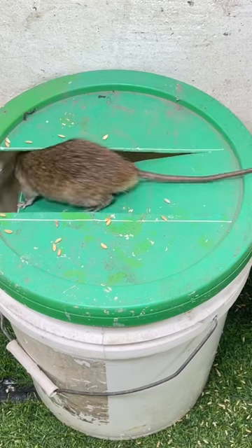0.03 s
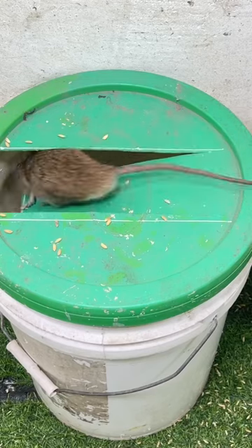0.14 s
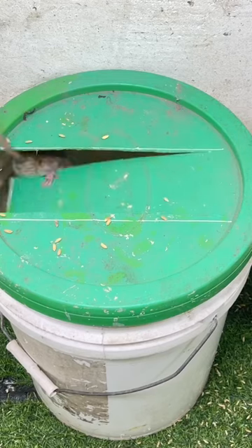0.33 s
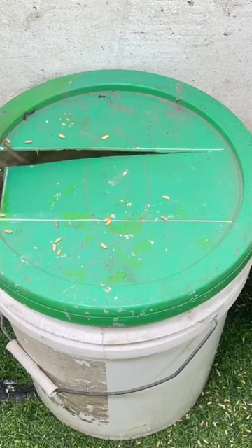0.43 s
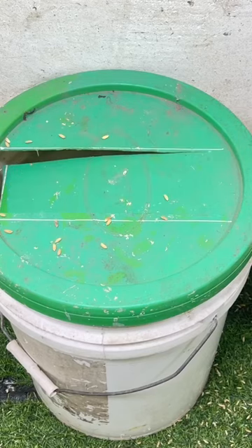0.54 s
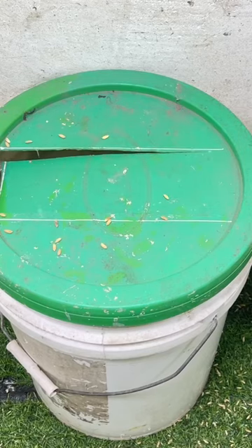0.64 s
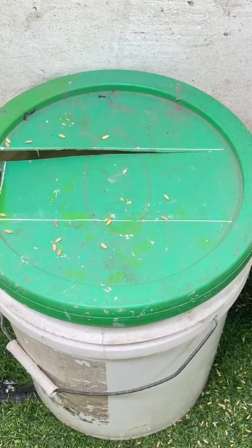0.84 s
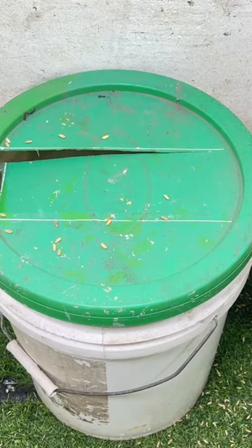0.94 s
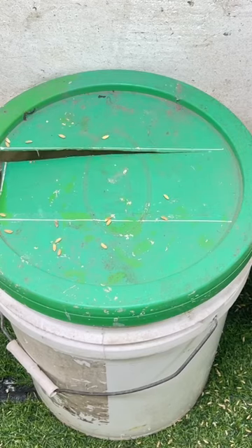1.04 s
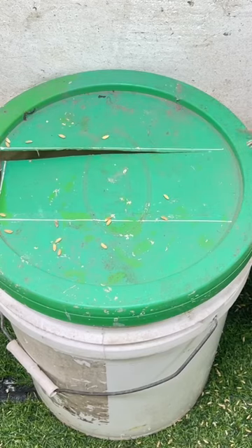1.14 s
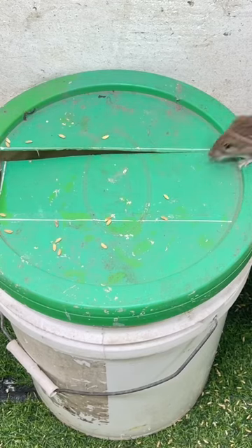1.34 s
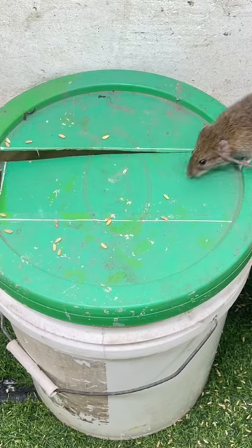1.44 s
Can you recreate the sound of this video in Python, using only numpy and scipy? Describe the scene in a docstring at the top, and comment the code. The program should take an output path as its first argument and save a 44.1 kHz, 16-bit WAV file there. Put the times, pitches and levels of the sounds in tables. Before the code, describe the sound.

A hollow thud and clatter from a plastic bucket outdoors: claws slide on the hinged lid, a rat lands inside and the flap swings back. Light scratches and ticks follow, heard in stereo with a short echo.

```python
"""Rat in a bucket trap

Outdoors beside a wall, a stereo pair of microphones hears a rat walk onto the hinged flap of a plastic
bucket lid. The flap tips, claws skid down it, the body thuds into the bucket and sets it booming, and
the flap swings shut with a clatter. Afterwards the rat scratches and shuffles inside. Wall and ground
throw back a short tail, and a low outdoor rumble lies under it all."""
import sys
import numpy as np
from scipy import signal
from scipy.fft import rfft, irfft
from scipy.io import wavfile

SR = 44100
rng = np.random.default_rng(int(sys.argv[2]) if len(sys.argv) > 2 else 0)


def digitize_waveform(pressure):
    """Quantize a signal to 16-bit integers and store it at the path in sys.argv[1].

    Rows of a 2-D input are taken as channels; values are limited to [-1, 1].
    """
    field = np.atleast_2d(pressure).T
    bounded = np.clip(field, -1, 1)
    quanta = np.round(bounded * 32767).astype(np.int16)
    wavfile.write(sys.argv[1], SR, quanta)


N = 66150
TIME = np.arange(N) / SR
HZ = np.maximum(np.arange(N + 1) * SR / (2 * N), 1)

# soft blows of the body on flap and bucket: (time [s], level [dB], contact cut-off [Hz])
BODY_THUDS = [(0.192, -25.5, 68.4), (0.2427, -39, 307), (0.3111, -34.5, 305), (0.4345, -19, 170),
              (0.444, -27.5, 163), (0.4865, -23.5, 204), (0.5072, -41, 194), (0.533, -38.5, 263),
              (0.901, -41.5, 141), (1.025, -42, 185), (1.142, -47.5, 170)]
# the bucket's air and walls: (frequency [Hz], level [dB], t60 [s])
BUCKET_MODES = [(83.1, -7, 0.5), (138.4, -3.5, 0.22), (149.2, 4.5, 0.19), (176.5, 0.5, 0.26),
                (219.3, -11, 0.62), (264.1, -7.5, 0.62)]
# the rat lands feet first, and later takes a step: (time [s], level [dB], contact cut-off [Hz])
FOOTFALLS = [(0.431, -29.5, 1490), (0.445, -30.5, 415), (0.995, -54, 730)]
# the bucket's floor: (frequency [Hz], level [dB], t60 [s])
FLOOR_MODES = [(492.6, -1.5, 0.15), (671, -3, 0.19), (878, -4.5, 0.11), (1094, -6, 0.17),
               (1328, -14.5, 0.097), (1564, -2.5, 0.05)]
# a foot drags over that floor: (time [s], level [dB])
FOOT_DRAG = [(0.77, -90), (0.828, -64), (0.85, -50.5), (0.93, -100)]

# hard knocks of flap on lid: (time [s], level [dB], contact cut-off [Hz], edge click level [dB])
FLAP_KNOCKS = [(0.3405, -40, 3600, -36.5), (0.4862, -21.5, 1800, -63), (0.4877, -28.5, 900, -33.5),
               (0.5031, -23, 422, -60), (0.5325, -33, 1440, -69), (0.58, -46, 1410, -41.5),
               (0.995, -57.5, 1600, -45.5)]
# the plastic lid: (frequency [Hz], level [dB], t60 [s])
LID_MODES = [(451.4, -5, 0.063), (494, -1, 0.13), (636, -6, 0.058), (671, -1, 0.076), (692, -11, 0.19),
             (768.5, -8, 0.14), (815, -12, 0.047), (961, -8.5, 0.08), (1153, -7.5, 0.064),
             (1411.4, -4, 0.11), (1487, -4.5, 0.033), (1696, -6.5, 0.13), (1800, -10.5, 0.11),
             (2180, -21, 0.13)]
# its crowd of short-lived modes: (frequency [Hz], relative density [dB])
CLATTER_COLOUR = [(200, 4), (420, 6), (740, 4), (1000, -0.5), (1500, 3), (2200, -4), (6000, -46)]
# the flap judders under sliding feet, then trembles as the rat moves below: (time [s], level [dB])
FLAP_JUDDER = [(0.225, -71), (0.255, -47.5), (0.33, -42.5), (0.37, -40.5), (0.41, -43.5), (0.48, -43),
               (0.6, -46.5), (0.72, -58.5), (1.38, -65)]
# a paw pushes the flap, which later rocks on its hinge: (time [s], level [dB], contact cut-off [Hz])
FLAP_TAPS = [(0.247, -34.5, 1490), (0.55, -38.5, 497), (0.631, -40.5, 685)]
# the flap swinging free: (frequency [Hz], level [dB], t60 [s])
FLAP_MODES = [(223.6, 0, 0.23), (375.3, 0.5, 0.084), (575, 0.5, 0.032), (896, -6, 0.046)]
# light taps on the flap's free edge: (time [s], level [dB])
EDGE_TAPS = [(0.2456, -38.5), (0.3426, -34), (0.347, -33)]
# that edge: (frequency [Hz], level [dB], t60 [s])
EDGE_MODES = [(1390, -1.5, 0.014), (1600, 1, 0.019), (1780, -4, 0.022), (2550, -10, 0.007)]

# claws sliding on the flap: (time [s], level [dB])
CLAW_SKID = [(0.168, -69), (0.177, -54), (0.215, -57), (0.25, -49.5), (0.285, -47), (0.32, -55.5),
             (0.35, -47), (0.395, -53.5), (0.425, -41), (0.442, -50.5), (0.458, -53.5), (0.52, -51.5),
             (0.59, -55), (0.65, -60.5), (0.72, -83)]
# claws on the bucket's floor: (time [s], level [dB])
CLAW_SHUFFLE = [(0.72, -71), (0.748, -53.5), (0.83, -69.5), (0.88, -65), (0.96, -63.5), (1.0, -62),
                (1.06, -67), (1.135, -64), (1.21, -64.5), (1.26, -58.5), (1.38, -70)]
# claw on plastic: (frequency [Hz], relative gain [dB])
CLAW_COLOUR = [(300, -7), (900, 18.5), (1700, 7.5), (2500, 6), (4000, 1), (6500, -3), (9000, -10),
               (15000, 1.5)]
# single claw catches and loose grain ticking: (time [s], level [dB], t60 [s], low edge [Hz])
CLAW_TICKS = [(0.0553, -36, 0.014, 9500), (0.223, -39.5, 0.12, 8500), (0.249, -45, 0.0087, 3050),
              (0.417, -38.5, 0.024, 2530), (0.428, -39, 0.083, 2320), (0.484, -35, 0.094, 7400),
              (0.746, -44.5, 0.088, 7200), (0.866, -51.5, 0.094, 900), (0.991, -51.5, 0.32, 1180),
              (1.102, -47, 0.18, 8650), (1.2492, -45, 0.018, 1300), (1.481, -55.5, 0.092, 700)]
# a claw's faint ping after the landing: (frequency [Hz], level [dB], t60 [s])
PING_MODES = [(4160, 0, 0.22), (6400, 7, 0.16)]
# fur and husks brushing over plastic: (time [s], level [dB])
FUR_BRUSH = [(0.16, -74), (0.226, -55), (0.34, -49), (0.43, -64), (0.46, -102), (0.52, -49.5), (0.6, -73.5),
             (1.07, -65.5), (1.135, -57.5), (1.22, -79)]
# the colour of that brushing: (frequency [Hz], relative gain [dB])
FUR_COLOUR = [(3000, -21), (6500, 5), (8400, -8.5), (11000, 4.5), (15000, 10)]

# reflections from the nearby wall and ground: (frequency [Hz], gain [dB])
ECHO_COLOUR = [(100, -40), (170, -12), (260, 3.5), (400, 9), (700, 3), (1500, -9), (3000, 3.5), (9000, -1)]
# outdoor background: (frequency [Hz], relative density [dB])
RUMBLE_COLOUR = [(22, -52), (33, -0.5), (46, 3.5), (62, -1.5), (82, 0), (115, -10), (160, -4), (220, -12),
                 (350, -10.5), (600, -19.5), (1100, -40.5), (2200, -35.5), (4000, -44), (7000, -51.5),
                 (15000, -39)]
# how alike noise is at the two microphones: (frequency [Hz], correlation [-1..1])
MIC_LIKENESS = [(60, 1), (160, 0.84), (300, 0.69), (600, 0.14), (1200, 0.21), (2500, 0.62), (5000, 0.95),
                (9000, 1)]
# response of both microphones: (frequency [Hz], gain [dB])
MIC_COLOUR = [(7000, -1), (8200, 9.5), (9300, 14), (9800, 4), (10200, -9.5), (11700, -8.5), (13000, -70),
              (15500, -33)]
# balance of the pair: (frequency [Hz], left over right [dB])
MIC_BALANCE = [(150, -1), (300, -2.5), (700, 1.1), (1300, -0.5), (2800, 3), (5000, 2), (8500, 0.5)]

PLASTIC_WIDTH = 0.46  # stereo spread of the lid's and the floor's modes


def bucket():
    """The body's soft blows set the bucket booming; feet land on its floor and drag over it."""
    boom = cut(strike(BODY_THUDS, BUCKET_MODES), hz=65.6, kind="high")
    slips = cut(grains(per_s=510, spread_db=0.5)[0], hz=850, kind="high")
    drag = cut(convolve(slips, ringing(FLOOR_MODES)), hz=1100, kind="low")
    feet = strike(FOOTFALLS, FLOOR_MODES, PLASTIC_WIDTH)
    return boom + feet + level(FOOT_DRAG) * rms_one(drag)


def flap():
    """Knocks and judder ring the lid, each knock with an edge click; softer taps ring the flap alone."""
    clatter = from_db(1) * noise(CLATTER_COLOUR) * dying(0, t60=0.13)
    lid = cut(ringing(LID_MODES, PLASTIC_WIDTH) + clatter, hz=170, kind="high")
    knocks = convolve(sum(contact(s, db, hz) for s, db, hz, _ in FLAP_KNOCKS), lid)
    clicks = noise(CLAW_COLOUR) * sum(from_db(db) * dying(s, t60=0.032) for s, _, _, db in FLAP_KNOCKS)
    slips = cut(grains(per_s=630, spread_db=0.5)[0], hz=900, kind="low", order=1)
    judder = convolve(slips, lid * dying(0, t60=0.038))
    taps = strike(FLAP_TAPS, FLAP_MODES, width=0.2)
    return knocks + clicks + taps + level(FLAP_JUDDER) * rms_one(judder)


def tipping():
    """The flap's edge rasps in quick slips as it gives way, and is tapped."""
    rim = ringing(EDGE_MODES, width=0.28)
    rasp = rms_one(convolve(grains(per_s=2100, spread_db=-1.0)[0], rim))
    taps = convolve(sum(contact(s, db, hz=5000) for s, db in EDGE_TAPS), rim)
    return from_db(-51) * dying(0.174, t60=0.57) * rasp + taps


def claws():
    """Claws and fur skid down the flap, then scratch about inside, catching now and then."""
    scratch = stereo(skitter(), CLAW_COLOUR) * (level(CLAW_SKID) + level(CLAW_SHUFFLE))
    fur = stereo(skitter(), FUR_COLOUR) * level(FUR_BRUSH)
    ping = convolve(contact(s=0.583, db=-58, hz=9000), ringing(PING_MODES))
    rasp = noise(CLAW_COLOUR)
    ticks = sum(tick(rasp, *row) for row in CLAW_TICKS)
    return scratch + fur + ping + ticks


def skitter(pitches=32, t60_cycles=28):
    """Two trains of tiny slips on plastic, each slip ringing briefly at a pitch dealt at random."""
    dealt = rng.integers(0, pitches, N)
    slips = grains(per_s=14000, spread_db=1)
    rings = 0
    for k, hz in enumerate(np.geomspace(500, 15000, pitches)):
        decay = from_db(-60 * hz / (t60_cycles * SR))
        angle = 2 * np.pi * hz / SR
        feedback = [1, -2 * decay * np.cos(angle), decay * decay]
        rings = rings + signal.lfilter([1 - decay, 0, decay - 1], feedback, slips * (dealt == k) + 1e-18)
    return rings


def tick(rasp, s, db, t60, hz):
    """One catch of a claw: a dying burst, rolled off below its low edge."""
    burst = cut(rasp * dying(s, t60), hz, "high", order=4)
    return from_db(db) * burst / np.std(cut(rasp, hz, "high", order=4))


def reflections(x, delay_s=0.0039):
    """The nearby wall and ground return a short diffuse tail, different at each microphone."""
    tail = shape(rng.standard_normal((2, N)), from_db(at_hz(ECHO_COLOUR)))
    fade = dying(delay_s, t60=0.38)
    return from_db(-9) * convolve(x, tail * fade / np.sqrt(np.sum(fade ** 2)))


def rumble(ease_db_per_s=2):
    """The low outdoor background of the place, easing slightly."""
    return from_db(-48 - ease_db_per_s * (TIME - TIME.mean())) * noise(RUMBLE_COLOUR)


def strike(hits, modes, width=0):
    """A table of blows rings a body."""
    return convolve(sum(contact(*row) for row in hits), ringing(modes, width))


def contact(s, db, hz):
    """Force of one blow at time s: the softer the contact, the lower its cut-off."""
    impulse = np.maximum(1 - abs(TIME - s) * SR, 0)
    return from_db(db) * cut(impulse, hz, "low")


def ringing(modes, width=0):
    """A body's answer to a click; neighbouring modes swing oppositely, and width spreads their phase."""
    leans = width * rng.choice([-1, 1], len(modes))
    response = 0
    for k, (hz, db, t60) in enumerate(modes):
        phase = 2 * np.pi * hz * TIME
        swing = np.sin(phase) + leans[k] * np.cos(phase) * [[1], [-1]]
        response = response + (-1) ** k * from_db(db) * dying(0, t60) * swing
    return response


def grains(per_s, spread_db):
    """Two trains of tiny slips, random in time and size."""
    sizes = from_db(spread_db * np.minimum(rng.exponential(1, N), 4))
    return (rng.random(N) < per_s / SR) * sizes * rng.standard_normal((2, N))


def noise(colour):
    """Coloured stereo noise."""
    return stereo(rng.standard_normal((2, N)), colour)


def stereo(pair, colour):
    """Colour two unrelated signals and blend them into left and right; rms 1."""
    alike = np.clip(at_hz(MIC_LIKENESS), -1, 1)
    gain = from_db(at_hz(colour))
    mid = shape(pair[0], gain * np.sqrt(1 + alike))
    side = shape(pair[1], gain * np.sqrt(1 - alike))
    return rms_one(np.array([mid + side, mid - side]))


def from_db(db):
    """Decibels to gain."""
    return 10 ** (np.asarray(db) / 20)


def rms_one(x):
    """Scale to rms 1."""
    return x / np.sqrt(np.mean(x ** 2) + 1e-20)


def at_hz(points):
    """Read a table along log frequency."""
    hz, value = np.transpose(points)
    return np.interp(np.log(HZ), np.log(hz), value)


def level(points):
    """Gain over time from a dB curve."""
    return from_db(np.interp(TIME, *np.transpose(points)))


def dying(s, t60):
    """Decay that starts at time s and falls 60 dB in t60 seconds."""
    return (TIME >= s) * from_db(-60 * np.maximum(TIME - s, 0) / t60)


def shape(x, gain):
    """Apply a gain per frequency."""
    return irfft(rfft(x, 2 * N) * gain)[..., :N]


def convolve(x, response):
    """Play x through a response."""
    return shape(x, rfft(response, 2 * N))


def cut(x, hz, kind, order=2):
    """Low- or high-pass; kind names the side that is kept."""
    sections = signal.butter(order, np.clip(hz, 10, .45 * SR), kind, fs=SR, output="sos")
    return signal.sosfilt(sections, x + 1e-18)


def scene():
    """The trap beside its wall, over the outdoor rumble."""
    trap = bucket() + flap() + tipping() + claws()
    return trap + reflections(trap) + rumble()


def record(dry):
    """The microphones peak in the high treble; the left hears a little sooner and, up high, louder."""
    left_lead_s, cutoff_hz = 2.6e-5, 16000
    sides = np.array([[.5], [-.5]])
    lead = np.exp(2j * np.pi * HZ * left_lead_s * sides)
    gain = from_db(at_hz(MIC_COLOUR) + at_hz(MIC_BALANCE) * sides)
    top_cut = signal.ellip(10, .1, 80, cutoff_hz, fs=SR, output="sos")
    return signal.sosfilt(top_cut, shape(dry, lead * gain))


dry = scene()
out = record(dry)
digitize_waveform(out)
```